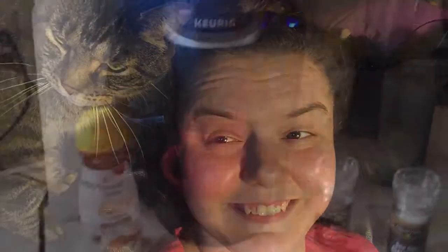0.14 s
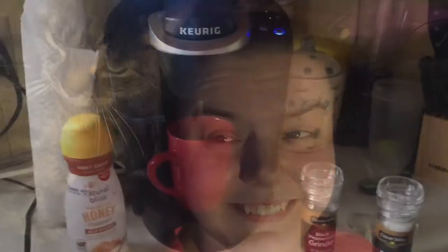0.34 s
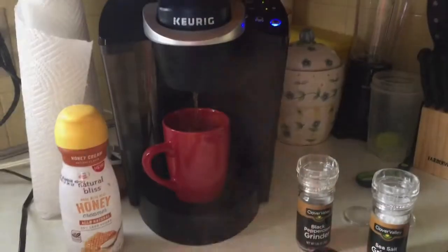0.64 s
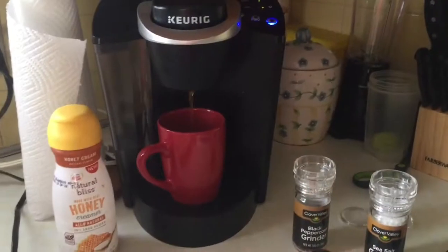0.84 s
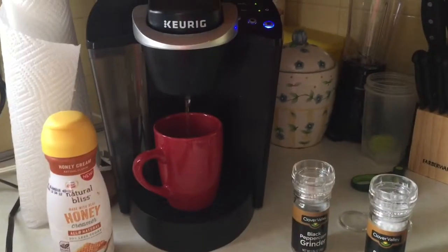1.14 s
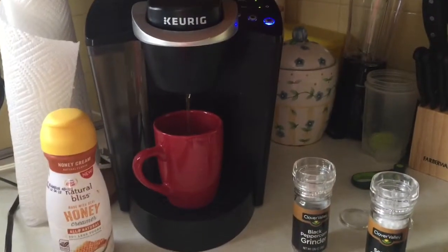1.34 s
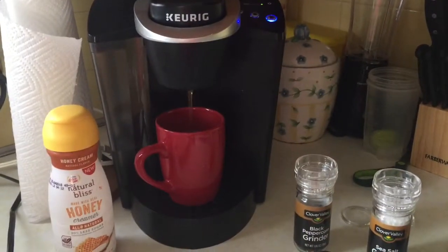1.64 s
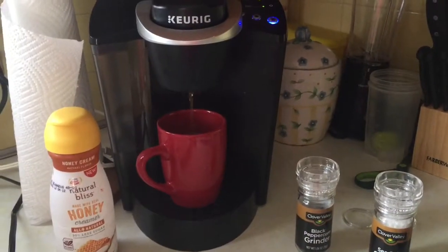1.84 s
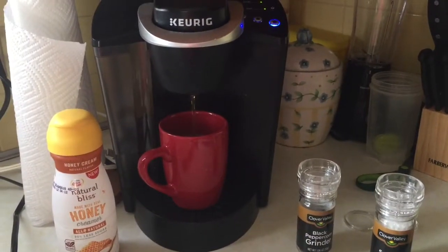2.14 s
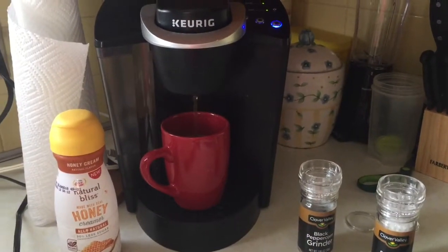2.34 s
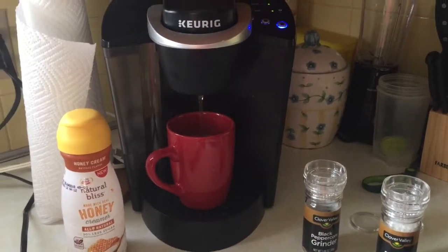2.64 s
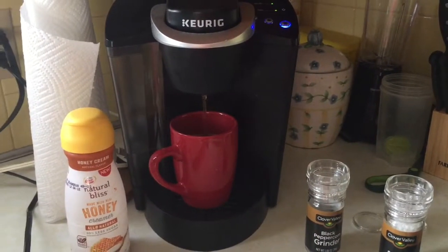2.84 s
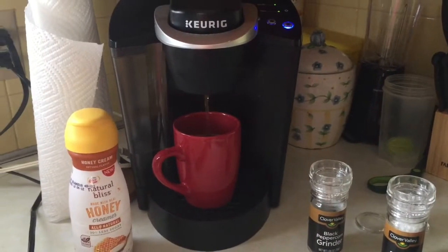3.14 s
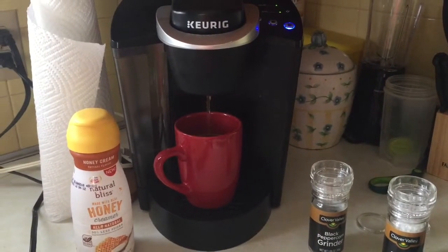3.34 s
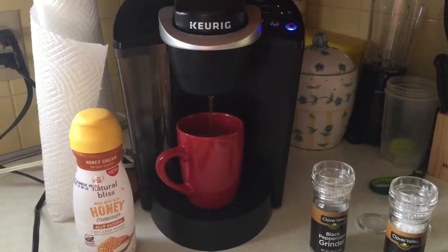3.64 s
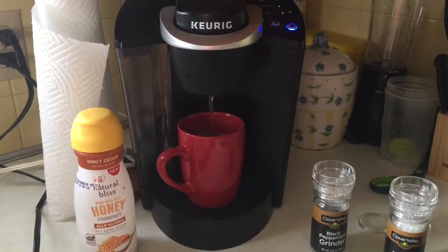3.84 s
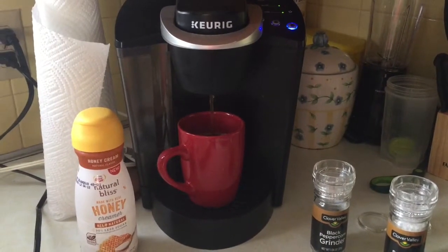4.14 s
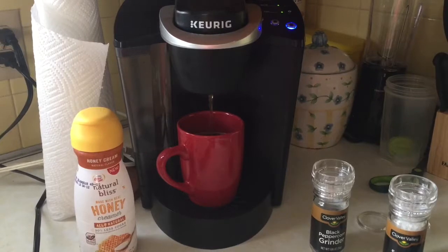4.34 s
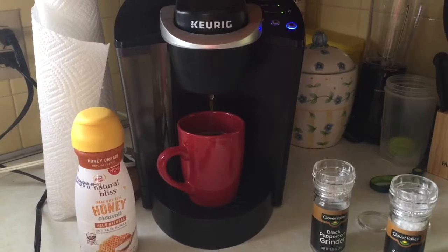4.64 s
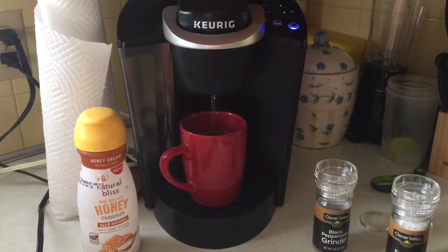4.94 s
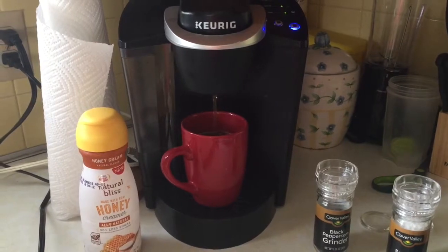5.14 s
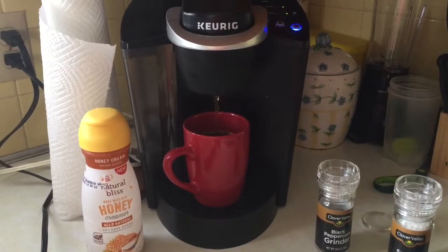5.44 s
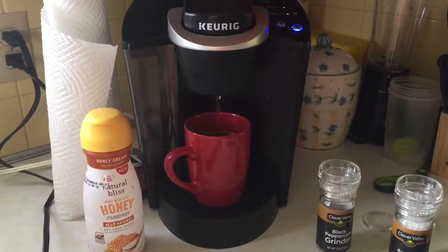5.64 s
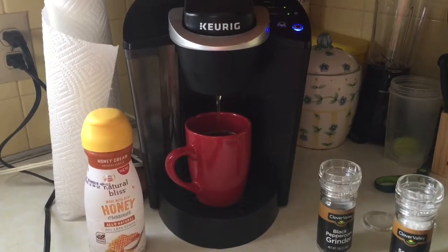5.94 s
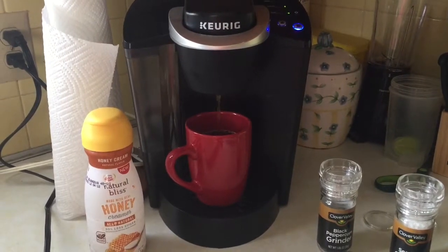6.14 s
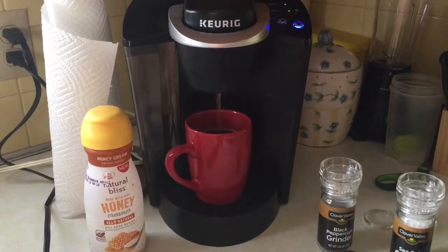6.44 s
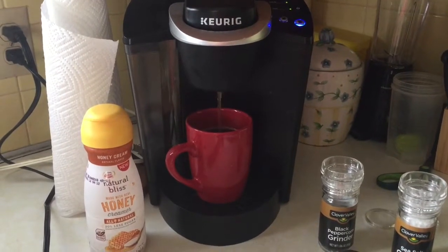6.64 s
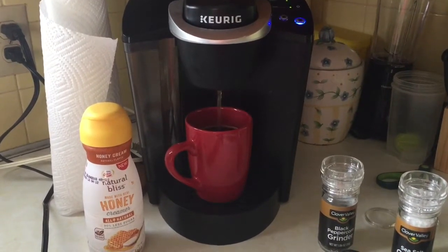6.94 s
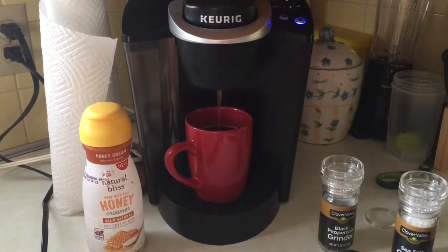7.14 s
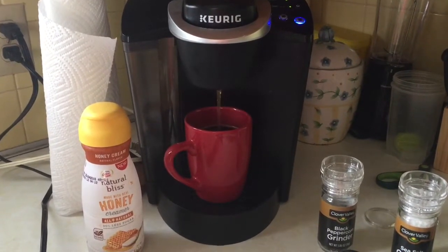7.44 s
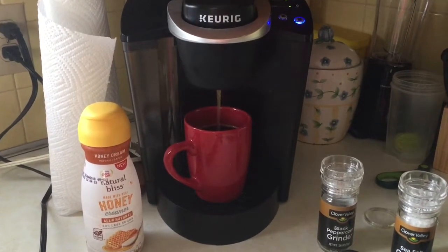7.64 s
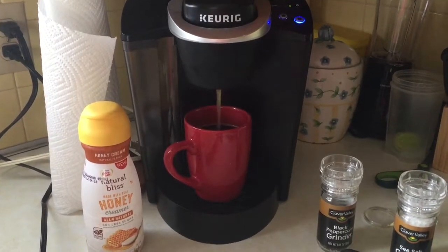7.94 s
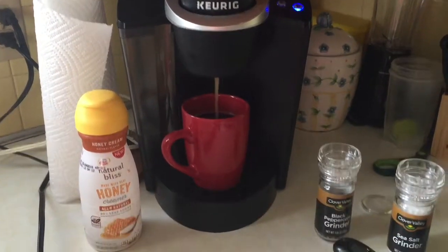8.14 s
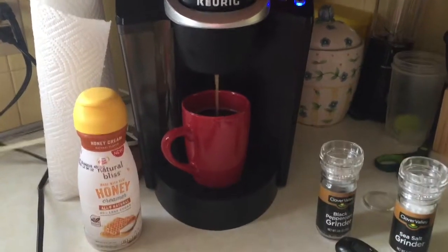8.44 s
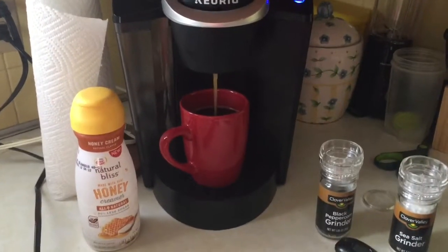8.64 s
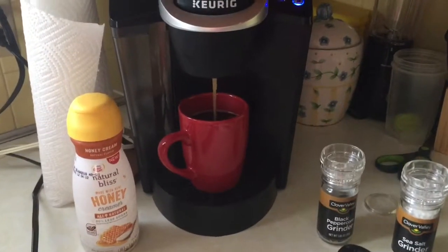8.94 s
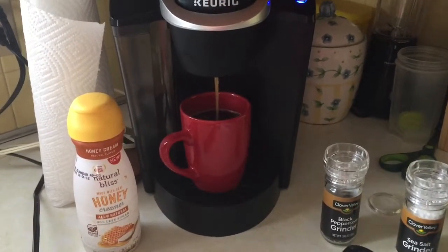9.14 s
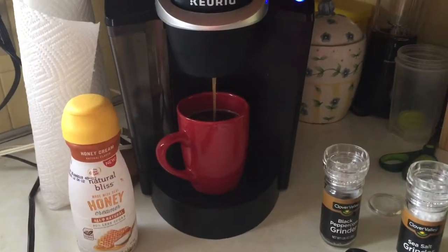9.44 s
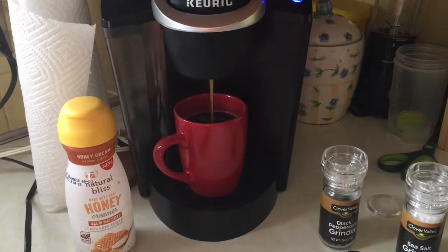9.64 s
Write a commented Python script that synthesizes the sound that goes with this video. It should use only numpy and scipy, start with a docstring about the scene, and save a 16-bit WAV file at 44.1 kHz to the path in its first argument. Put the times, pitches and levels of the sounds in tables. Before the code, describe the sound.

Close by on a kitchen counter, a coffee machine dribbles into a mug: short hollow spurts, sharp watery ticks and a thin flickering hiss, irregular and quiet. A fridge hums low behind, and a drone from another room fades away at the start. After about seven and a half seconds, air drives a loud, gurgling, sputtering stream that lasts to the end.

```python
"""Small coffee machine brewing into a mug

On a kitchen counter the outlet first spits short spurts: noise bursts that ring the hollow of machine and mug.
Pinged drops tick on the coffee over a thin hiss; then air pressure drives a loud gurgling stream with mist.
A fridge hums in wavering tones and shaped noise; the drone of another room fades out at the start."""
import sys
import numpy as np
from scipy import signal
from scipy.fft import rfft, irfft
from scipy.io import wavfile
from scipy.ndimage import uniform_filter1d, map_coordinates

SR = 44100
rng = np.random.default_rng(int(sys.argv[2]) if len(sys.argv) > 2 else 0)


def dump(signal):
    """Clip the signal to [-1, 1] and save it as 16-bit WAV at the path in sys.argv[1]."""
    limited = np.clip(np.atleast_2d(signal).T, -1, 1)
    pcm = np.round(limited * 32767).astype(np.int16)
    wavfile.write(sys.argv[1], SR, pcm)


def gain_from_decibels(decibels):
    """Convert decibel values to linear amplitude factors."""
    exponent = np.asarray(decibels, float) / 20
    return 10 ** exponent


N = 431738
SIZE = N + SR  # a second of silence for rings to die in
TIME = np.arange(N) / SR
FREQ = np.arange(SIZE // 2 + 1) * SR / SIZE
FADE_S = 0.72  # the other room is gone after this


def level(x, db):
    """Scale to an rms level."""
    return x * gain_from_decibels(db) / np.sqrt(np.mean(x ** 2))


def noise():
    """White noise."""
    return rng.standard_normal(N)


def filtered(x, gain):
    """Multiply the spectrum by a gain."""
    return irfft(rfft(x, SIZE) * gain, SIZE)[..., :N]


def coloured(x, points):
    """Shape by a (pitch [Hz], level [dB]) spectrum."""
    hz, db = np.transpose(points)
    return filtered(x, gain_from_decibels(np.interp(np.log(FREQ + 1), np.log(hz), db)))


def resonance(hz, width):
    """Complex response of one resonance, 1 at its peak."""
    f = FREQ + 1e-3  # avoids dividing by zero
    return 1 / (1 + 1j * hz / abs(width) * (f / hz - hz / f))


def resonate(x, modes, band):
    """Ring resonances of alternating sign; white noise comes out with rms 1 in the band."""
    gain = 0
    for k, (hz, width, db) in enumerate(modes):
        gain = gain + (-1) ** k * gain_from_decibels(db) * resonance(hz, width)
    f = FREQ + 1e-3
    inside = (f > band[0]) & (f < band[1])
    return filtered(x, gain) / np.sqrt(np.sum(np.abs(gain[inside]) ** 2) / len(f))


def walk(rate):
    """Random levels held 1 / rate s and slewed twice; spread 1."""
    k = int(SR / rate)
    steps = np.repeat(rng.standard_normal(N // k + 1), k)
    return level(uniform_filter1d(uniform_filter1d(steps, k), k)[:N], 0)


def wander(x, share, rate):
    """Let all pitches drift up and down by a share, by a delay that moves to and fro."""
    delay = share * SR / (2 * rate) * walk(rate)
    return map_coordinates(x, [np.arange(N) + delay], order=3, mode="mirror")


def bubbling(rate, spread_db):
    """Noise made of many small bursts (rate per second) of uneven size; rms 1."""
    bursts = (rng.random(N) < rate / SR) * gain_from_decibels(spread_db * rng.standard_normal(N))
    return level(np.sign(noise()) * bursts, 0)


def bell(centre, ms):
    """Power shape of the push behind a gush, and the samples it covers: a sudden start, a slower end."""
    near = slice(max(int((centre - .1) * SR), 0), int((centre + .15) * SR))
    # the hollow needs some cycles to ring up, so the push comes a little before the sound peaks
    t = (TIME[near] - centre + 0.0072) / (ms / 1000) + 0.14
    return near, np.exp(-np.abs(t / np.where(t < 0, .3, .7)) ** 3)


def tone(hz, db, wobble_hz):
    """A motor line whose pitch and level waver."""
    phase = 2 * np.pi * np.cumsum(hz + wobble_hz * walk(15)) / SR
    waver_db = 0.19 * wobble_hz ** 0.54 * walk(16.0)
    return level(np.sin(phase) * gain_from_decibels(waver_db), db)


# colour of the kitchen air: (pitch [Hz], relative level [dB])
AIR_COLOUR = [(25, -41), (45, -13), (100, -12), (150, -13.5), (190, -6), (225, -5), (270, -9), (380, -17),
              (600, -46), (1200, -39)]
# fridge motor lines, once the fade is over: (pitch [Hz], rms level [dB], wobble [Hz])
FRIDGE_LINES = [(58.2, -60.5, 0.27), (102.4, -64, 1.64), (207.4, -54, 1.49), (242.4, -62, 1.3),
                (310.5, -64, 1.52)]
# casing of the fridge, shaken by its fan: (pitch [Hz], width [Hz], relative level [dB])
FRIDGE_CASING = [(178, 25, -9.5), (217.5, 12.4, 1), (240, 7, -4.5), (449.8, 19.2, -5)]
# drone of the other room before its fade: (pitch [Hz], rms level [dB])
ROOM_DRONE = [(258, -47), (276, -53)]


def kitchen():
    """Fridge lines and casing over a low rumble, and the other room's drone and rumble fading out."""
    fade = np.clip(1 - TIME / FADE_S, 0, 1)
    here = sum(tone(*row) for row in FRIDGE_LINES) + level(coloured(noise(), AIR_COLOUR), -51.5)
    casing_band = (FRIDGE_CASING[0][0], FRIDGE_CASING[-1][0])
    casing_db = -53 + 2.0 * walk(3.03)
    here = here + gain_from_decibels(casing_db) * resonate(noise(), FRIDGE_CASING, casing_band)
    other = sum(tone(hz, db, .3) for hz, db in ROOM_DRONE)
    other = other + level(coloured(noise(), AIR_COLOUR), -51)
    # mains hum is in both rooms, stronger in the other
    mains = tone(119.6, -54, 0.18) * (1 + 1.25 * fade)
    return here * (1 - 0.56 * fade) + other * fade + mains


# thin trickle, which hiss, dribble and patter follow at their own offsets: (time [s], level [dB])
TRICKLE_LEVEL = [(0.0, -59.5), (0.52, -55), (0.68, -51.5), (1.18, -53.5), (1.37, -58.5), (1.54, -49.5),
                 (2.07, -54.5), (2.64, -54), (2.79, -54.5), (3.22, -54), (3.66, -53), (4.0, -55.5),
                 (5.06, -55), (5.44, -53.5), (5.74, -56.5), (6.65, -54), (6.75, -54), (7.49, -53.5),
                 (7.6, -49.5)]


def trickle_db():
    """Level of the trickle over time."""
    return np.interp(TIME, *np.transpose(TRICKLE_LEVEL))


# colour of the trickle: (pitch [Hz], relative level [dB])
HISS_COLOUR = [(350, -26), (600, 0.5), (779, -3.5), (970, -2), (1180, -11), (1930, -15), (2150, -13),
               (4840, -14), (7300, -24), (8400, -11.5), (10400, -20.5), (12800, -15.5), (15600, -24.5),
               (20000, -3)]


def trickle():
    """A thin flickering hiss of running coffee, weaker at first."""
    hiss = level(coloured(noise(), HISS_COLOUR), 0)
    rise_db = np.interp(TIME, [0, FADE_S], [-5, 0])
    flicker_db = 2.0 * walk(12) + 2.8 * walk(70)
    return hiss * gain_from_decibels(trickle_db() + rise_db + 2.0 + flicker_db)


# surfaces near the mug: (delay [s], gain [ratio])
NEAR_ECHOES = [(.0056, 0.15)]


def room(x):
    """Echoes off mug and machine, a quick scatter in the counter nook, then the kitchen's tail."""
    t = TIME[:int(.4 * SR)]
    response = 1. * (t == 0)
    for delay, gain in NEAR_ECHOES:
        response[int(delay * SR)] = gain
    # nook, then kitchen: (decay by 60 dB [s], level [dB], start [s])
    for t60, db, start in [(0.072, -8, .0015), (0.43, -13.5, .005)]:
        tail = rng.standard_normal(len(t)) * np.exp(-np.log(1000) * t / t60) * (t > start)
        # both swallow the treble above 8100 Hz
        tail = signal.sosfilt(signal.butter(1, 8100, fs=SR, output="sos"), tail)
        response += tail * gain_from_decibels(db) / np.sqrt(np.sum(tail ** 2))
    return signal.fftconvolve(x, response)[:N]


def ping(out_db, hz, sharp, crack):
    """A drop: a few cycles that swell, glide up and die; blunt drops also crackle over the whole band."""
    t = np.arange(len(crack)) / SR
    decay = np.pi * hz / (0.57 * max(sharp, .3))
    swell = decay * t * np.exp(1 - decay * t)
    bubble = swell * np.sin(2 * np.pi * hz * t * (1 + 0.0019 * decay * t))
    click = 2.5 * np.exp(-((t - 0.0001) / 0.00003) ** 2)
    crackle = crack * np.exp(-t / 0.0017) - click
    # lower drops crackle less
    sound = bubble + 0.65 / (1 + sharp ** 2) * (hz / 5000) ** 0.69 * crackle
    return gain_from_decibels(out_db) * sound / np.abs(sound).max()


def add(out, s, sound):
    """Mix a sound in at a time."""
    i = int(s * SR)
    out[i:i + len(sound)] += sound[:N - i]


# clear drops and bursting bubbles, before tick colour and room:
# (time [s], peak level [dB], pitch [Hz], sharpness as pitch over width [ratio])
DROP_TICKS = [(0.205, -39, 3570, 13), (0.224, -38, 12300, 3.5), (0.236, -39, 3730, 5),
              (0.37, -31.5, 2120, 2.7), (0.385, -33, 4700, 4), (0.408, -38, 2060, 2.6),
              (0.5214, -40, 2240, 4.6), (0.5802, -35, 2130, 4.5), (0.607, -43, 13600, 3.7),
              (0.6142, -32, 2020, 5), (0.6556, -24, 3160, 1.9), (0.7006, -35, 2070, 8.5),
              (0.7375, -29.5, 1900, 4.5), (0.791, -35, 11500, 2.7), (0.8296, -25.5, 1480, 5.1),
              (0.843, -27.5, 5970, 2.9), (0.8606, -25, 2630, 1.7), (0.9274, -42, 1760, 3),
              (0.951, -31, 2110, 5.3), (1.097, -26, 4170, 1.5), (1.325, -35, 3220, 3.8),
              (1.3508, -32, 1360, 5.5), (1.386, -28, 2840, 1.6), (1.4056, -17.5, 4200, 2.3),
              (1.449, -31, 1580, 4), (1.46, -18.5, 4550, 4.5), (1.5908, -23.5, 2970, 1.65),
              (1.8973, -31.5, 4600, 4.9), (1.913, -31, 2640, 1.7), (1.9254, -30, 1660, 3.4),
              (1.933, -38, 3580, 5), (2.067, -35, 3520, 2.7), (2.182, -35.5, 4450, 5.9),
              (2.288, -25, 4060, 1.8), (2.2953, -22, 6200, 0.47), (2.4055, -33, 1570, 6.1),
              (2.5026, -28, 4780, 4), (2.5417, -34, 2050, 3.8), (2.596, -23, 2820, 1.1),
              (2.626, -31, 1430, 4), (2.8765, -27, 14730, 7), (2.9666, -13.5, 3460, 0.94),
              (3.045, -37, 4570, 7.2), (3.1414, -30.5, 4900, 6.2), (3.236, -27.5, 3580, 3),
              (3.268, -43, 2100, 8.3), (3.326, -49, 2130, 2), (3.4124, -26, 1940, 3.9),
              (3.467, -38, 1660, 4.3), (3.521, -30, 1570, 3.8), (3.559, -34, 1630, 5.8),
              (3.5776, -37, 1930, 9), (3.638, -25.5, 1410, 5.4), (3.646, -30, 1540, 3.9),
              (3.667, -50, 3280, 3), (3.7385, -34, 2290, 3.8), (3.839, -36, 1610, 3),
              (3.913, -37.5, 3290, 3.8), (4.016, -32, 9500, 7), (4.1054, -21, 9150, 4.1),
              (4.164, -18, 8500, 2.5), (4.203, -51, 2170, 3.3), (4.499, -29.5, 3070, 1.7),
              (4.528, -33.5, 4650, 7.9), (4.574, -34, 3100, 2.5), (4.5798, -32, 2710, 1.1),
              (4.6097, -27, 2070, 5.4), (4.6177, -25.5, 2570, 1.9), (4.7659, -29, 2240, 1.5),
              (4.784, -35, 1700, 5), (4.796, -42, 1900, 4.5), (4.8834, -35, 1600, 4.1),
              (5.103, -23, 8250, 1.9), (5.197, -22, 12100, 3.8), (5.221, -31, 2300, 2.5),
              (5.2542, -25.5, 8050, 1.2), (5.277, -39, 1760, 3.6), (5.33, -25.5, 3060, 1.6),
              (5.346, -25, 3240, 1.8), (5.3947, -36, 1900, 1.5), (5.546, -44, 2320, 4),
              (5.5693, -39, 2090, 6.5), (5.5886, -39, 2500, 2.1), (5.6205, -34, 3500, 1.4),
              (5.718, -39, 1590, 5.6), (5.77, -39, 2300, 2.6), (5.8896, -35, 3750, 4),
              (6.0083, -43, 2060, 5), (6.129, -27.5, 2820, 1.1), (6.15, -31, 2380, 3.7),
              (6.158, -40, 3550, 9.4), (6.185, -42, 3550, 4.9), (6.2594, -31, 1450, 3.8),
              (6.3402, -26, 1480, 2.2), (6.3762, -29, 2760, 1.8), (6.4057, -29.5, 2340, 5.4),
              (6.5361, -28.5, 11840, 2.4), (6.6094, -16, 2830, 1.09), (6.7, -27, 1550, 3),
              (6.823, -26, 3500, 1.3), (6.8534, -34, 2160, 2.2), (6.9638, -25, 5440, 0.54),
              (7.0466, -26.5, 2370, 1.7), (7.06, -33, 3430, 3.9), (7.157, -31, 12500, 1.5),
              (7.1934, -28.5, 8050, 0.94), (7.2743, -22.5, 13300, 4.5), (7.403, -30, 1390, 2.2),
              (7.472, -20, 3600, 1.3), (7.4895, -19.5, 3720, 2.4), (7.526, -24, 2530, 0.92),
              (7.659, -24, 2510, 0.88), (8.239, -24, 3750, 4.2), (8.442, -10.5, 7200, 0.31),
              (8.701, -17, 1810, 1.1), (8.856, -17.5, 2820, 2), (9.203, -23, 3940, 4.1),
              (9.3093, -26, 8200, 4.9)]
# tick colour, the overall treble balance of the drops: (pitch [Hz], gain [dB])
TICK_COLOUR = [(500, -1.5), (1400, -7), (3000, 2), (5000, -3), (6000, 1), (7200, 1.5), (8500, 5),
               (10400, 1), (12000, 2.5), (16000, -2)]


def drops():
    """Loud ticks, bursting air pockets and a random patter at the trickle's level, lower in the stream."""
    out, thin_db = np.zeros(N), trickle_db()
    # a surge shorter than 20 ms carries one large bubble just before its peak
    pockets = [(s - 0.0035, db + 4, 985, 11) for s, ms, db in STREAM_SURGES if ms < 20]
    for s, db, hz, sharp in DROP_TICKS + pockets:
        add(out, s, ping(db, hz, sharp, rng.standard_normal(900)))
    for when, pitch, sharp, size in rng.random((900, 4)):
        s = when * (N - 1) / SR
        flow_db = thin_db[int(s * SR)] - 3.0 * (s > STREAM_LEVELS[1][0])
        # few drops are large, and high ones are weaker
        drop_db = flow_db + 9.0 + 13 * size ** 5.1 - 7.0 * pitch
        hz = 1400 * 5.0 ** pitch ** 3.0
        add(out, s, ping(drop_db, hz, 2.0 + 7 * sharp, rng.standard_normal(600)))
    # the drops ring the walls 15 dB below themselves
    wall_modes = [m[:2] + m[3:] for m in WALL_MODES]
    ring = level(resonate(out, wall_modes, GROUP_BANDS[1]), -15) * np.std(out)
    return coloured(out, TICK_COLOUR) + ring


def glug():
    """A large air cavity hums low for a moment under the surface as the stream sets in."""
    out = np.zeros(N)
    near, shape = bell(7.84, 90)  # centre s, length ms
    out[near] = np.sqrt(shape)
    return out * tone(545, -44, 8.0)


# steady stream: (time [s], hollow gurgle level [dB], bright splutter level [dB], spray level [dB])
STREAM_LEVELS = [(7.55, -58, -52.5, -62), (7.7, -35.5, -46, -57), (7.82, -31.5, -43, -54),
                 (8.031, -31, -44.5, -51.5), (8.33, -27.5, -41, -46), (8.49, -29, -43, -53),
                 (8.6, -34, -45.5, -52.5), (8.715, -37, -45, -51), (8.87, -33, -44, -48),
                 (9.0, -29, -42.5, -45.5), (9.48, -29.5, -41.5, -44), (9.79, -27.5, -41, -42)]
# air pockets that swell the stream: (centre [s], length [ms], hollow gurgle level [dB])
STREAM_SURGES = [(7.66, 25, -29), (7.917, 64, -31), (8.603, 12, -29), (8.687, 14, -25), (8.727, 10, -29),
                 (8.761, 14, -27), (8.81, 16, -25), (8.885, 12, -26), (8.921, 12, -27), (9.591, 54, -26.5),
                 (9.758, 36, -29)]


def flow():
    """Strength of gurgle, splutter and spray in the stream with its surges."""
    s, *columns = np.transpose(STREAM_LEVELS)
    power = np.array([gain_from_decibels(np.interp(TIME, s, db, left=-120)) ** 2 for db in columns])
    for centre, ms, db in STREAM_SURGES:
        near, shape = bell(centre, ms)
        power[:, near] += shape * gain_from_decibels([[db], [db - 25], [db - 27]]) ** 2
    return np.sqrt(power)


# colour of the stream's mist: (pitch [Hz], relative level [dB])
MIST_COLOUR = [(1500, -18), (2200, 4), (3200, 8), (5000, -8), (8500, -16.5), (12000, -32), (16000, -5)]


def mist():
    """Fine broadband spray thrown up in fits where the stream hits the coffee."""
    fits = gain_from_decibels(2.5 * walk(30) + 1.5 * walk(8))
    spray = level(fits * coloured(bubbling(4000, 4.4), MIST_COLOUR), 0)
    return gain_from_decibels(-5) * flow()[2] * spray  # 5 dB under the ringing spray


# clear spurts from the outlet: (centre [s], length [ms], hollow gurgle level [dB])
OUTLET_SPURTS = [(0.06, 56, -49.5), (0.21, 43, -48.5), (0.315, 52, -45.5), (0.49, 34, -44),
                 (0.627, 42, -43.5), (0.824, 42, -48), (0.958, 39, -46), (1.487, 17, -35.5),
                 (1.535, 15, -47), (1.628, 11, -36), (1.67, 38, -34), (1.751, 30, -40.5), (1.96, 27, -58),
                 (2.411, 4.3, -35.5), (2.491, 46, -44.5), (2.663, 8.6, -42), (2.73, 9.2, -33.5),
                 (2.805, 25, -38), (3.109, 32, -44.5), (3.197, 36, -37.5), (3.373, 11, -42.5),
                 (3.471, 7.1, -40), (3.644, 3.3, -38), (3.709, 9, -48), (3.759, 49, -42.5),
                 (4.221, 33, -43.5), (4.271, 32, -40), (4.514, 13.4, -39.5), (4.981, 32, -42),
                 (5.107, 9.3, -43), (5.64, 17, -46.5), (6.059, 7.3, -39), (6.102, 29, -43),
                 (6.406, 35, -46.5), (6.474, 5.3, -40.5), (6.688, 37, -51), (6.774, 35, -45.5),
                 (7.135, 23, -35.5), (7.186, 14, -47.5), (7.295, 49, -47), (7.484, 29, -44.5),
                 (7.579, 87, -45.5)]


def spurts():
    """Strength of gurgle, splutter and spray while the outlet spits and drops splash."""
    # faint spurts at random moments before the stream
    when, size, long = rng.random((30, 3)).T
    faint_db = -52.5 + 12 * (2 * size - 1)
    faint = zip(when * STREAM_LEVELS[0][0], 13 * (.5 + long), faint_db)
    # splutter is -50 dB at a gurgle of -41 dB and grows more slowly than it
    rows = [(s, ms, db, -50 + 0.63 * (db + 41.0)) for s, ms, db in [*OUTLET_SPURTS, *faint]]
    # a drop pitched below 4500 Hz leaves a 9 ms splutter without gurgle
    for s, db, hz, _ in DROP_TICKS:
        if hz < 4500:
            rows.append((s + 0.0038, 9, -120, -46 + 0.48 * (db + 1.0)))
    power = np.zeros((len(GROUP_BANDS), N))
    for centre, ms, gurgle_db, splutter_db in rows:
        near, shape = bell(centre, ms)
        power[:, near] += shape * gain_from_decibels([[gurgle_db], [splutter_db], [splutter_db - 8.5]]) ** 2
    return np.sqrt(power)


# resonances of the hollow, its walls and the outlet, levels relative within each group:
# (pitch [Hz], width [Hz], level in the stream [dB], level in a spurt [dB])
HOLLOW_MODES = [(390, 67, -21, -18.5), (540.5, 22, -13.5, -11.5), (604, 46, -16.5, -33),
                (707, 27, -11, -12), (819, 25, -8, -7.5), (864, 29, -8, -13), (904, 28, -6.5, -5.5),
                (981, 31, 2.5, 4), (1035, 39, -5.5, -0.5), (1078, 14, -4.5, -1), (1133, 54, -8.5, -11.5),
                (1197, 26, -2.5, -8), (1306, 33, -7.5, -6), (1391, 21.5, -5, -5.5), (1553, 160, -18.5, -18)]
WALL_MODES = [(1900, 72, 1, -29), (2082, 29, 5, 10.5), (2164, 31, 3.5, 9), (2289, 39, 2.5, 9),
              (2506, 125, 5.5, 0.5), (2653, 17, -28, 7.5), (3010, 62, 3.5, -3.5), (3584, 250, -13, -2)]
OUTLET_MODES = [(4340, 110, 10.5, 10.5), (5250, 130, 1, -3), (5775, 210, 8, 6), (6800, 180, 3.5, 1),
                (7340, 180, 0, -1), (8040, 116, 12, -23), (8520, 190, 9, -3), (8750, 170, 8, 4.5),
                (9560, 340, -5.5, -5), (10800, 500, -5.5, -30), (11800, 790, -5.5, -3),
                (14200, 270, -7, -23)]
# band in which each group's level is stated: (low [Hz], high [Hz])
GROUP_BANDS = [(850, 1450), (1900, 2700), (4000, 15000)]
# dribble into each group, against the trickle: (level [dB])
GROUP_DRIBBLE = [-7, -10, -20]
# exponent on each group's flutter in the full stream: (share [ratio])
GROUP_STEADY = [.4, .6, .9]
# the sloshing surface shifts each group's resonances up and down: (share of pitch [ratio])
GROUP_SHIFT = [0.0036, .005, 0.0049]


def machine():
    """Air and coffee burst through the outlet and ring the three groups of resonances."""
    out, shared = 0, level(gain_from_decibels(1.2 * walk(60)), 0)
    rates, flutters_db = [2500, 3000, 6000], [.6, 1.8, 3.0]  # rates scale the bubbles per second
    groups = zip([HOLLOW_MODES, WALL_MODES, OUTLET_MODES], GROUP_BANDS, flow(), spurts(),
                 rates, flutters_db, GROUP_DRIBBLE, GROUP_STEADY, GROUP_SHIFT)
    for modes, band, stream, spit, rate, flutter_db, dribble_db, steady, shift in groups:
        uneven = shared * gain_from_decibels(flutter_db * walk(40))
        # between the spurts a dribble follows the trickle's level
        dribble = gain_from_decibels(trickle_db() + dribble_db + 0.37 * walk(25.6))
        spit = np.hypot(spit, (TIME < STREAM_LEVELS[0][0]) * dribble)
        pour = stream * uneven ** steady * bubbling(2 * rate, 3.45)
        out = out + wander(resonate(pour, [m[:3] for m in modes], band), shift, 12)
        # spitting is made of fewer, more separate bubbles than the stream
        spitting = spit * uneven * bubbling(.6 * rate, 4.7)
        out = out + wander(resonate(spitting, [m[:2] + m[3:] for m in modes], band), shift, 12)
    return out


def filling(x):
    """The air column of the filling mug lifts the upper gurgle from 8.4 s on."""
    column = filtered(x, resonance(1250, 76))
    return x + 0.4 * (TIME > 8.4) * column


def scene():
    """All sources at the counter."""
    background = kitchen() + trickle()
    brewing = room(drops()) + glug() + mist() + filling(machine())
    return (background + brewing)[None]


def band_limit(x):
    """A steep low-pass at the top of the band."""
    return signal.sosfilt(signal.butter(12, 16850, fs=SR, output="sos"), x)


def record(dry):
    """A low cut at 42 Hz, and a steep treble cut-off from 15650 Hz."""
    low_cut = signal.butter(3, 42, "high", fs=SR, output="sos")
    treble_cut = gain_from_decibels(np.interp(FREQ, [15650, 15800, 16500, 16650], [0, -40, -40, -70]))
    mix = filtered(signal.sosfilt(low_cut, dry), treble_cut)
    return band_limit(mix)


dry = scene()
out = record(dry)
dump(out)
```